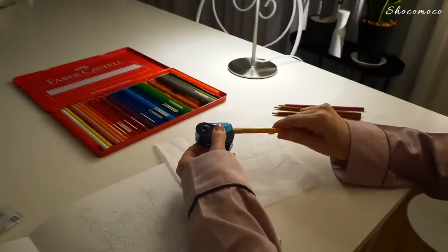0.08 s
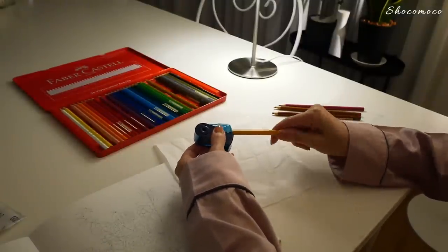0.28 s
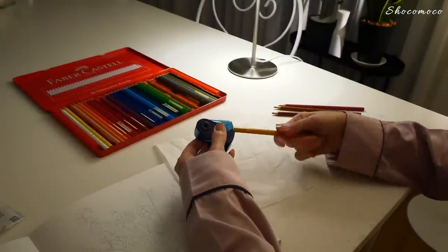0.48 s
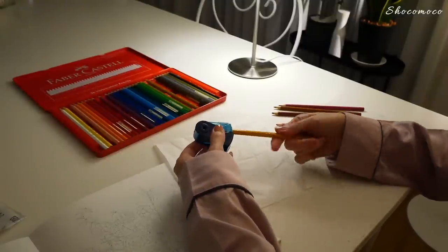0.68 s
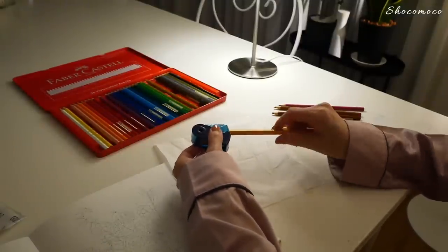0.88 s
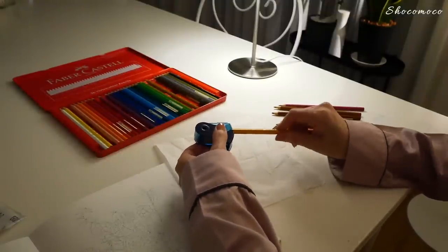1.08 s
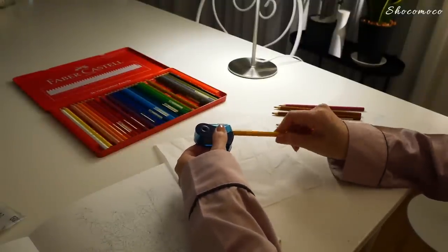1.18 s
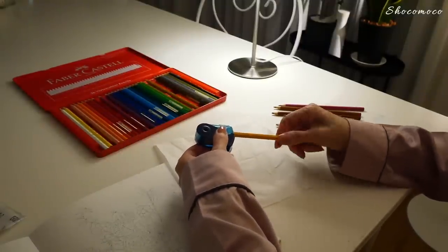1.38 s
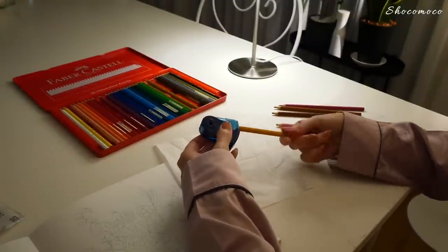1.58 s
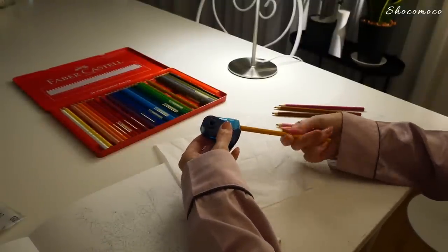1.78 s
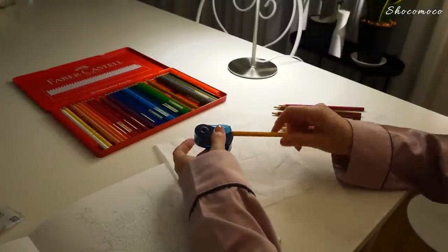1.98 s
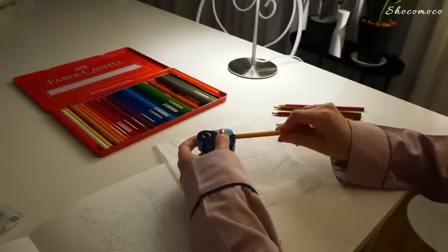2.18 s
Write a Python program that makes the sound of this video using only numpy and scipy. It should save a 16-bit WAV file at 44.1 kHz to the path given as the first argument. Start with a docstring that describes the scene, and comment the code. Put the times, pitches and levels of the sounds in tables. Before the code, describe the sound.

A wooden pencil twisted twice in a small plastic sharpener, crisp scraping crackle in a quiet room

```python
"""At a table in a quiet room, a wooden pencil is twisted twice in a small plastic sharpener.
The blade tears wood fibres: dense tiny clicks and some loud snaps ring in broad resonances of the housing.
A distant appliance thuds unevenly about sixty times a second by striking a few low modes, over a low drone.
Filtered noise makes the hum of the room and the hiss of the microphone; table and room scatter the near sounds."""
import sys
import numpy as np
from scipy import signal
from scipy.io import wavfile

SR = 44100
rng = np.random.default_rng(int(sys.argv[2]) if len(sys.argv) > 2 else 0)


def wrap_up_sound(samples):
    """Save the sound to the file named by the first command line argument, as 16-bit audio."""
    columns = np.atleast_2d(samples).T
    # keep every value between -1 and 1, then stretch to whole-number steps
    tamed = np.clip(columns, -1, 1)
    steps = np.round(tamed * 32767).astype(np.int16)
    wavfile.write(sys.argv[1], SR, steps)


def field_ratio(decibels):
    """Amplitude ratio for a level in dB (20 dB per decade); scalars and array-likes work."""
    return 10 ** (np.asarray(decibels, dtype=float) / 20)


N = 97020  # length in samples


def rms_one(x):
    """Scale to rms 1."""
    return x / np.sqrt(np.mean(x ** 2) + 1e-20)


def at_hz(points, hz):
    """Read a spectrum table on a logarithmic frequency axis."""
    table_hz, values = np.transpose(points)
    return np.interp(np.log(hz), np.log(table_hz), values)


def drift(rate_hz):
    """Slow random wandering with spread 1: noise smoothed above rate_hz, made at a tenth of the sample rate."""
    r = np.exp(-20 * np.pi * rate_hz / SR)
    noise = rng.standard_normal(N // 10 + 4002)
    slow = signal.lfilter([1], [1, -2 * r, r * r], noise)[4000:]  # skip the filter's start
    return np.interp(np.arange(N) / 10, np.arange(len(slow)), rms_one(slow))


def band(x, low_hz, high_hz, order):
    """Keep what lies between two frequencies."""
    return signal.sosfilt(signal.butter(order, [low_hz, high_hz], "band", fs=SR, output="sos"), x)


def resonance(x, hz, width_hz):
    """Two-pole resonance applied twice, with gain 1 at its peak."""
    r = np.exp(-np.pi * width_hz / SR)
    row = [(1 - r * r) / 2, 0, (r * r - 1) / 2, 1, -2 * r * np.cos(2 * np.pi * hz / SR), r * r]
    return signal.sosfilt([row, row], x + 1e-18)


def moving_resonance(x, hz, width_hz):
    """A two-pole resonance applied twice, its centre stepped every 256 samples; the result has rms 1."""
    r = np.exp(-np.pi * width_hz / SR)
    state, out = np.zeros((2, 2)), np.zeros(N)
    for i in range(0, N, 256):
        row = [1 - r, 0, r - 1, 1, -2 * r * np.cos(2 * np.pi * hz[i] / SR), r * r]
        out[i:i + 256], state = signal.sosfilt([row, row], x[i:i + 256] + 1e-18, zi=state)
    return rms_one(out)


HUM_DB = -54.5  # rms of the whole floor
HUM_PATCHY_DB, PATCHY_HZ, PATCHY_BELOW_HZ = 2.5, 5.54, 3000  # wandering, halved at PATCHY_BELOW_HZ
# spectrum of room and microphone noise: [f/Hz, relative level/dB per Hz]
HUM_SPECTRUM = [(12, -34), (22, -11), (53, -1.5), (96, -8), (130, -5.5), (184, -7.5), (250, -4.5),
                (400, -7.5), (650, -10), (750, -10.5), (1240, -14.5), (1700, -21), (2500, -27.5),
                (3600, -18.5), (4400, -25), (5300, -31.5), (6300, -22), (7500, -22), (10000, -27),
                (14700, -21.5), (16500, -22.5)]
# how alike left and right are: [f/Hz, likeness (1 = the same)]
LEFT_RIGHT_LIKENESS = [(60, 0.97), (180, 0.98), (550, 0.96), (1650, 0.86), (4970, 0.42), (15000, 0.83)]


def hum():
    """Quarter-octave bands of stereo noise, each with its level, flicker and left-right likeness."""
    out, edges = 0, 20 * 2 ** (np.arange(41) / 4)
    white = rng.standard_normal((2, 2, N + SR // 2))  # neighbouring bands use different noise
    for k, (low, high) in enumerate(zip(edges, np.minimum(edges[1:], .45 * SR))):
        mid, side = band(white[k % 2], low, high, 2)[:, -N:]
        hz = np.sqrt(low * high)
        alike = np.clip(at_hz(LEFT_RIGHT_LIKENESS, hz), -1, 1)
        flicker_db = HUM_PATCHY_DB * drift(PATCHY_HZ) / (1 + hz / PATCHY_BELOW_HZ)
        gain = field_ratio(at_hz(HUM_SPECTRUM, hz) + flicker_db)
        out = out + gain * (np.sqrt(1 + alike) * mid + np.sqrt(1 - alike) * side * [[1], [-1]])
    return field_ratio(HUM_DB) * rms_one(out)


def drone():
    """Noise through a narrow low resonance, heard as a deep drone under the appliance."""
    hz, width_hz, rms_db = 39.6, 8.6, -67
    noise = rng.standard_normal(N + SR)
    return field_ratio(rms_db) * rms_one(resonance(noise, hz, width_hz)[SR:])


BEATS_PER_S, FIRST_BEAT_S, BEAT_SPREAD_DB = 59.95, .0025, 1.5
MODE_SPREAD_DB = 1.2  # chance in how hard each strike drives each mode
THUD_LOW_HZ, THUD_HIGH_HZ = 356, 672  # band that gets through
# strength of the steady beats before modes and band: [t/s, level/dB]
BEAT_STRENGTH = [(0, -49), (.15, -55.5), (.3, -62), (.7, -48.5), (1.35, -49), (1.6, -52.5), (1.9, -47.5),
                 (2.2, -66)]
# louder thuds, as strikes before modes and band: [t/s, level/dB, brightness/dB]
LOUD_THUDS = [(0.07, -53.5, 16), (0.51, -36.5, 3.5), (0.769, -43.5, 7), (0.82, -56, 7), (0.903, -50, 21),
              (0.938, -50, 14), (1.001, -50, 19), (1.036, -42, 2), (1.102, -41.5, 11), (1.185, -50.5, 8),
              (1.27, -47, 15), (1.301, -54, -13), (1.588, -44, -2), (1.871, -48, 11)]
# low modes that are struck: [f/Hz, level/dB, 60 dB decay/s, share of the brightness]
APPLIANCE_MODES = [(406, -4, .07, -.5), (512, -5.5, .07, .5), (555, -14, .045, .5), (630, -12, .045, .5),
                   (280, -12, .05, -.5), (1100, -16, .04, 0)]


def appliance():
    """Uneven soft beats at a steady rate, and louder thuds, strike a few decaying low modes."""
    beats = np.arange(FIRST_BEAT_S, N / SR, 1 / BEATS_PER_S)
    beat_db = np.interp(beats, *np.transpose(BEAT_STRENGTH))
    beat_db = beat_db + BEAT_SPREAD_DB * rng.standard_normal(len(beats))
    thud_s, thud_db, thud_bright_db = np.transpose(LOUD_THUDS)
    s = np.concatenate([beats, thud_s])
    db = np.concatenate([beat_db, thud_db])
    bright_db = np.concatenate([0 * beats, thud_bright_db])
    chances = rng.standard_normal((len(APPLIANCE_MODES), len(s)))
    out = 0
    for (hz, mode_db, t60_s, share), chance in zip(APPLIANCE_MODES, chances):
        strikes = np.zeros(N + SR)
        strike_db = db + mode_db + share * bright_db + MODE_SPREAD_DB * chance
        np.add.at(strikes, (s * SR).astype(int), field_ratio(strike_db))
        r, w = field_ratio(-60 / (t60_s * SR)), 2 * np.pi * hz / SR
        out = out + signal.lfilter([0, np.sin(w)], [1, -2 * r * np.cos(w), r * r], strikes + 1e-18)
    return band(out, THUD_LOW_HZ, THUD_HIGH_HZ, 2)[:N]


TABLE_DB, TABLE_T60_S, TABLE_CUT_HZ = -12.5, 0.0037, 1600


def table(x):
    """Treble scatters off table and hands for a few milliseconds, with opposite sign on the two sides."""
    t = np.arange(600) / SR
    taps = rng.standard_normal(len(t)) * field_ratio(-60 * t / TABLE_T60_S)
    side = signal.fftconvolve(x, taps / np.sqrt(np.sum(taps ** 2)))[:N]
    treble = signal.sosfilt(signal.butter(1, TABLE_CUT_HZ, "high", fs=SR, output="sos"), side)
    return field_ratio(TABLE_DB) * treble * [[1], [-1]]


ROOM_T60_S, WALL_CUT_HZ = 0.28, 22000
ROOM_DB, ROOM_SIDE_DB = -17, -13  # the sides are relative to the middle
SIDE_LIFT_DB, SIDE_LIFT_HZ, SIDE_LIFT_TOP_HZ = 3, 2540, 8900  # band added to the sides


def room(x):
    """Echoes from two sets of eight feedback delays, duller each round: one for the middle, one for the sides."""
    out, dull = np.zeros((2, N)), np.exp(-2 * np.pi * WALL_CUT_HZ / SR)
    for k, lag in enumerate((np.geomspace(.009, .04, 16) * SR).astype(int)):
        loop, gain, state = x.copy(), field_ratio(-60 * lag / SR / ROOM_T60_S), [0.]
        for i in range(lag, N, lag):
            back, state = signal.lfilter([gain * (1 - dull)], [1, -dull], loop[i - lag:i], zi=state)
            loop[i:i + lag] += back[:N - i]
        out[k % 2] += (loop - x) * (-1) ** (k // 2)  # only the echoes
    for lag in (73, 151):  # all-pass filters blur the echoes
        a = np.r_[1, np.zeros(lag - 1), -.6]
        out = signal.lfilter(a[::-1], a, out)
    middle, side = out
    side = side + field_ratio(SIDE_LIFT_DB) * band(side, SIDE_LIFT_HZ, SIDE_LIFT_TOP_HZ, 1)
    return field_ratio(ROOM_DB) * (middle + field_ratio(ROOM_SIDE_DB) * side * [[1], [-1]])


# the crackle of a -25 dB snap fades by 60 dB in SNAP_T60_S; a louder one tears for longer
SNAP_RISE_S, SNAP_T60_S, LONGER_WITH_DB = .0003, .006, .6
CRACK = 2.5  # height of the first break against the crackle
# snapping fibres: [t/s, peak level/dB, middle rings (4-5 kHz)/dB, top rings/dB]
FIBRE_SNAPS = [(0.2112, -42, -8, -13), (0.2257, -14, -13, -12), (0.2367, -27, -3, 1), (0.25, -26, -9, -16),
               (0.3003, -25, -12, -27), (0.3257, -30, -9, -17), (0.3402, -28.5, -7, -19),
               (0.3554, -26, -9, -7), (0.3638, -31, -30, -19), (0.387, -35, -15, -15),
               (0.393, -29, -12, -15), (0.405, -29, -12, -14), (0.469, -31.5, -20, -11),
               (0.4754, -30, -4, -19), (0.4806, -26, -18, -19), (0.5104, -31.5, 9, -13),
               (0.5324, -29, -2, -13), (0.5468, -25, -19, -23), (0.5626, -26, -13, -18),
               (0.5657, -27, -14, -17), (0.5768, -19, -9, -10), (1.2216, -45, -12, -10),
               (1.237, -41, -12, -18), (1.3047, -38, -21, -11), (1.4325, -31, -11, -12),
               (1.4954, -46, -15, -7), (1.528, -27.5, -5, -11), (1.5541, -20.5, -3, -9),
               (1.5652, -30, -10, -3), (1.5764, -28, -17, -18), (1.6945, -27, -4, -13),
               (1.7265, -20.5, -2, -8), (1.7296, -28.5, 2, -9), (1.7553, -27, 2, -1),
               (1.7774, -31, -4, -15), (1.821, -40.5, -25, -23), (2.1166, -43.5, -5, -15)]
# what a snap rings in: [f/Hz, width/Hz, level/dB, snap column that steers it]
SNAP_RESONANCES = [(1800, 1200, -35.5, "main"), (3830, 1700, -27, "middle"), (4820, 740, -1, "middle"),
                   (5860, 2400, -13.5, "middle"), (6890, 1300, -8, "main"), (7720, 920, -8, "main"),
                   (8250, 780, -10, "main"), (10850, 930, 2, "top"), (12700, 850, -10, "top"),
                   (14650, 3000, 2.5, "top")]


def snaps():
    """Each snap is a burst of crackle a few milliseconds long, ringing briefly in blade and housing."""
    t = np.arange(1500) / SR
    out = np.zeros(N + len(t))
    bursts = rng.standard_normal((len(FIBRE_SNAPS), len(t)))
    for (s, db, middle, top), burst in zip(FIBRE_SNAPS, bursts):
        burst[int(SNAP_RISE_S * SR)] += CRACK
        t60_s = SNAP_T60_S * field_ratio(LONGER_WITH_DB * (db + 25))
        crackle = burst * np.minimum(t / SNAP_RISE_S, 1) * field_ratio(-60 * t / t60_s)
        steer = dict(main=0, middle=middle, top=top)
        snap = 0
        for k, (hz, width_hz, ring_db, column) in enumerate(SNAP_RESONANCES):
            ring = rms_one(resonance(crackle, hz, width_hz))
            snap = snap + (-1) ** k * field_ratio(ring_db + steer[column]) * ring  # alternating signs
        out[int(s * SR):][:len(t)] += field_ratio(db) * snap / np.abs(snap).max()
    return out[:N]


GRAINS_PER_S, GRAIN_SPREAD_DB = 8000, 4.2
GRAIN_CLUMP_DB, CLUMP_HZ = 1.2, 200


def grains():
    """Tearing fibres as dense clicks of uneven size, slightly clumped."""
    born = rng.random(N) < GRAINS_PER_S / SR
    uneven_db = GRAIN_SPREAD_DB * np.minimum(rng.exponential(1, N), 4)
    sizes = field_ratio(uneven_db + GRAIN_CLUMP_DB * drift(CLUMP_HZ))
    return born * sizes * rng.choice([-1, 1], N)


BITE_S, LET_GO_S = .004, .003  # fade in before and fade out after each group of points
LOW_DB, LOW_WIDTH_HZ, MAIN_DB, MAIN_WIDTH_HZ = -1, 400, -2.5, 1100
RESONANCE_FLICKER_DB, FLICKER_HZ = 1.5, 15
OWN_GRAINS_DB = -2  # grains exciting one resonance only, against those exciting all
# cutting strokes, in groups of points: [t/s, level/dB, then relative to it the low/dB, 4 kHz/dB, 5 kHz/dB,
# 6 kHz/dB and top/dB resonances, then the centres of the low f/Hz and the main f/Hz resonance]
CUTTING_STROKES = [
    [(0.231, -39.5, -21.5, -23, -14, -11, 0, 1760, 7560),
     (0.241, -37, -19.5, -8, -17, -13, -1.5, 1740, 7550),
     (0.273, -51.5, -15.5, -10, -14, -8, -1, 1720, 7600), (0.399, -44.5, -12, -9, -19, -34, -4, 1670, 7000),
     (0.427, -42.5, -15, -9, -24, -24, -7, 1740, 6650),
     (0.459, -44.5, -15.5, -1.5, -12, -15, -2.5, 1840, 7960),
     (0.583, -40, -9.5, -8, -13, -10, -3, 1750, 7260),
     (0.659, -50.5, -15.5, -8.5, -19, -4.5, -3, 2000, 8040), (0.775, -73, -9, 3, -27, -12, -10, 1800, 7300)],
    [(1.2, -84, -14, -8, -11, -6, 0, 1950, 7670), (1.238, -55, -3.5, -9, -18, -23, -5.5, 1900, 7800),
     (1.296, -57.5, -20, -27, -18, -18, -9, 1920, 7850),
     (1.306, -49.5, -7, -6.5, -16, -29, -10, 1910, 7900),
     (1.322, -55, -10.5, -17, -20, -19, -8, 1960, 7360),
     (1.398, -50, -10, -11.5, -18, -14.5, -2, 1950, 7750), (1.522, -50, -5, -13, 0.5, -2, 1, 1900, 7970),
     (1.549, -45.5, -9.5, -30, -4, -7, -1, 1970, 7800)],
    [(1.557, -38, -14, -31, -8, -1, -1.5, 1750, 7600),
     (1.592, -44.5, -14, -12.5, -6, -11, -0.5, 1830, 8300),
     (1.644, -44.5, -10.5, -11, -4.5, -6.5, -0.5, 1800, 7900),
     (1.742, -44.5, -12, -1.5, -27, -2, 0.5, 1920, 8260), (1.818, -62.5, -8.5, -7, -5, -5, 2.5, 1520, 8200),
     (1.842, -61.5, -29, -21, -15, -18, -6, 1640, 8200), (1.92, -84, 3, -2, 12, 12, 2, 1580, 7400)],
]
# steady resonances of housing and blade: [f/Hz, width/Hz, level/dB, stroke column that steers it]
HOUSING_RESONANCES = [(1050, 500, -8, "low"), (2600, 600, -10, "low"), (3450, 800, -5, "four"),
                      (4200, 680, -2.5, "four"), (5150, 800, 1, "five"), (6150, 1000, -1, "six"),
                      (8700, 1200, -10, "main"), (9800, 1200, -7, "top"), (11200, 1400, -4.5, "top"),
                      (12300, 1500, -7, "top"), (13300, 800, -5.5, "top"), (15000, 1800, -6, "top")]


def shaving():
    """Clumped grains of tearing wood under the stroke, through each resonance at its own level."""
    rows = []
    for stroke in CUTTING_STROKES:
        first, last = stroke[0], stroke[-1]
        rows += [(first[0] - BITE_S, -90, *first[2:]), *stroke, (last[0] + LET_GO_S, -90, *last[2:])]
    times, *columns = np.transpose(rows)
    t = np.arange(N) / SR
    level, low, four, five, six, top, low_hz, main_hz = [np.interp(t, times, c) for c in columns]
    steer = dict(main=0, low=low, four=four, five=five, six=six, top=top)
    shared = grains()

    def excitation():
        """Shared grains plus fresh ones for a single resonance."""
        return shared + field_ratio(OWN_GRAINS_DB) * grains()

    low_gain = field_ratio(LOW_DB + low + RESONANCE_FLICKER_DB * drift(FLICKER_HZ))
    out = low_gain * moving_resonance(excitation(), low_hz, LOW_WIDTH_HZ)
    out = out + field_ratio(MAIN_DB) * moving_resonance(excitation(), main_hz, MAIN_WIDTH_HZ)
    for k, (hz, width_hz, db, column) in enumerate(HOUSING_RESONANCES):
        gain = field_ratio(db + steer[column] + RESONANCE_FLICKER_DB * drift(FLICKER_HZ))
        out = out + (-1) ** k * gain * rms_one(resonance(excitation(), hz, width_hz))
    return field_ratio(level) * out


def scene():
    """Sharpener and appliance in the middle, table and room around them, the noise floor below."""
    near = appliance() + drone() + snaps() + shaving()
    return hum() + near + table(near) + room(near)


def band_limit(x):
    """A steep low-pass at the top of the band."""
    return signal.sosfilt(signal.butter(12, 16830, fs=SR, output="sos"), x)


def record(dry):
    """A steep low-pass filter removes the top of the treble."""
    cutoff_hz = 15760
    mix = signal.sosfilt(signal.ellip(12, .5, 65, cutoff_hz, fs=SR, output="sos"), dry)
    return band_limit(mix)


dry = scene()
out = record(dry)
wrap_up_sound(out)
```